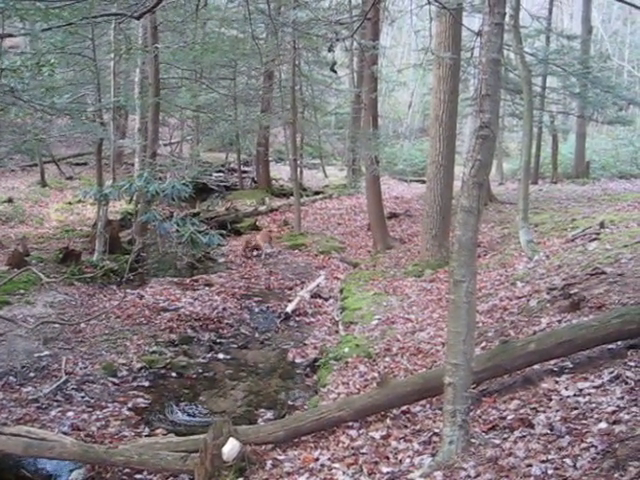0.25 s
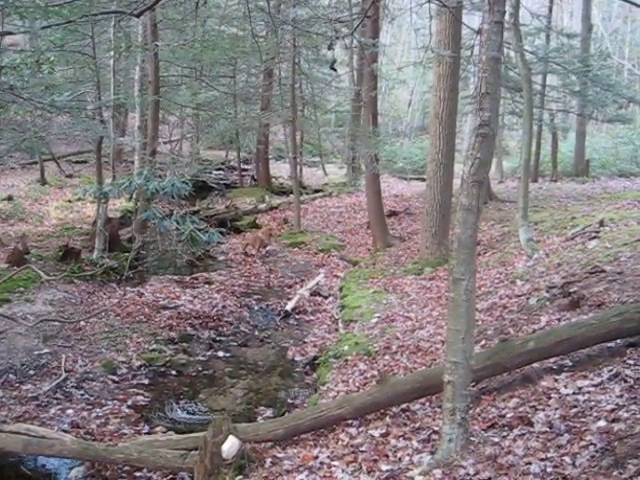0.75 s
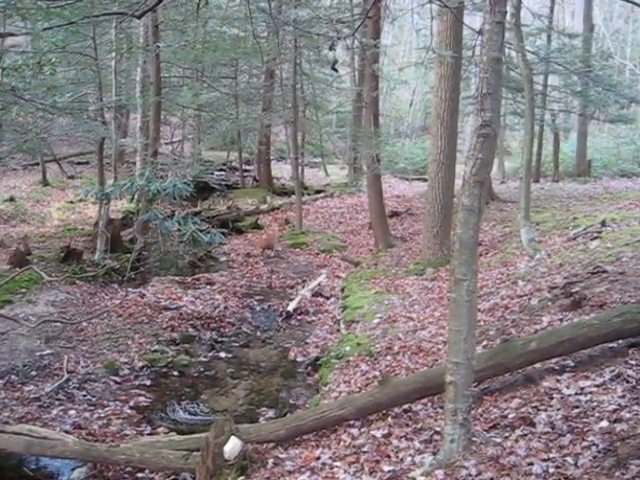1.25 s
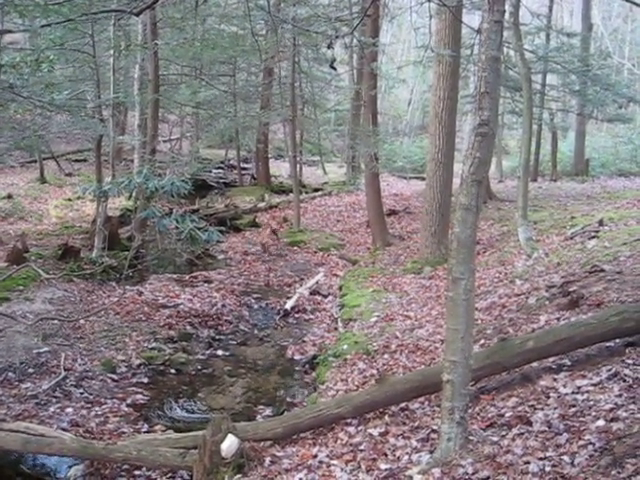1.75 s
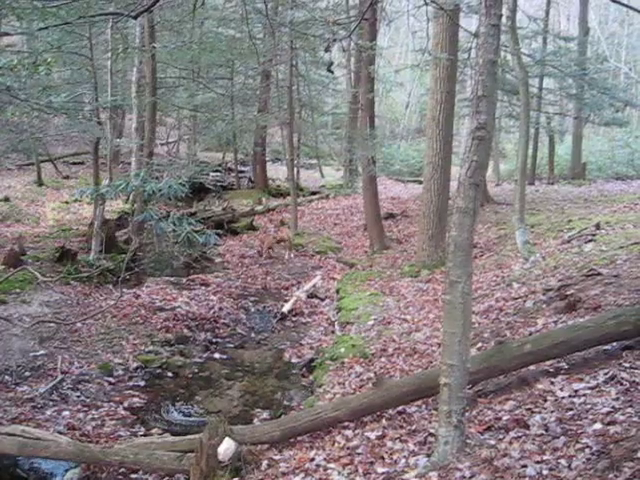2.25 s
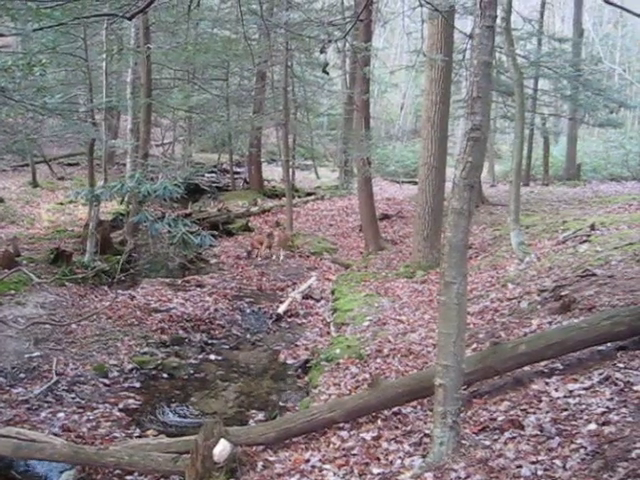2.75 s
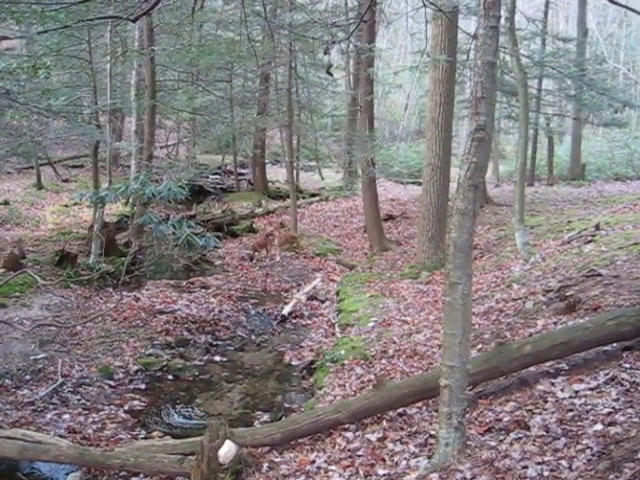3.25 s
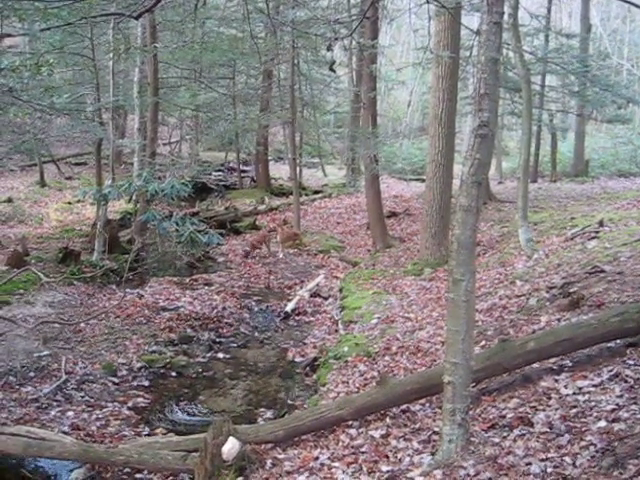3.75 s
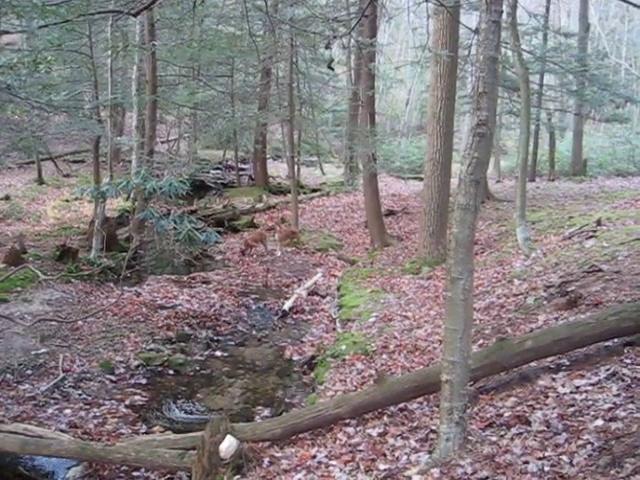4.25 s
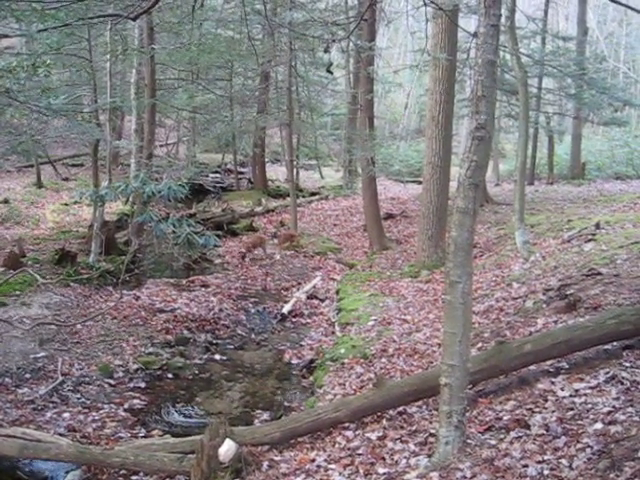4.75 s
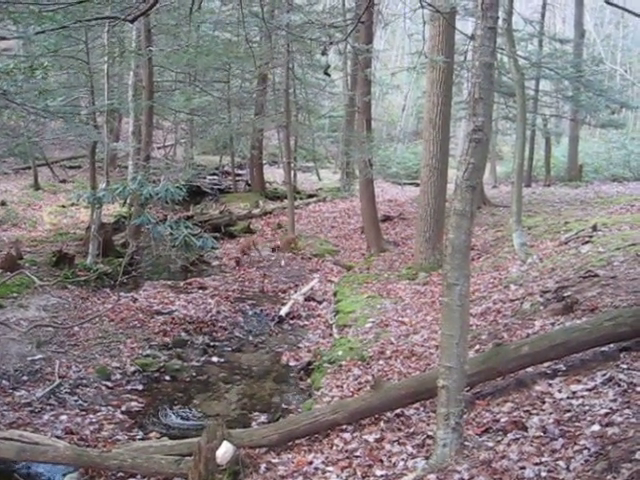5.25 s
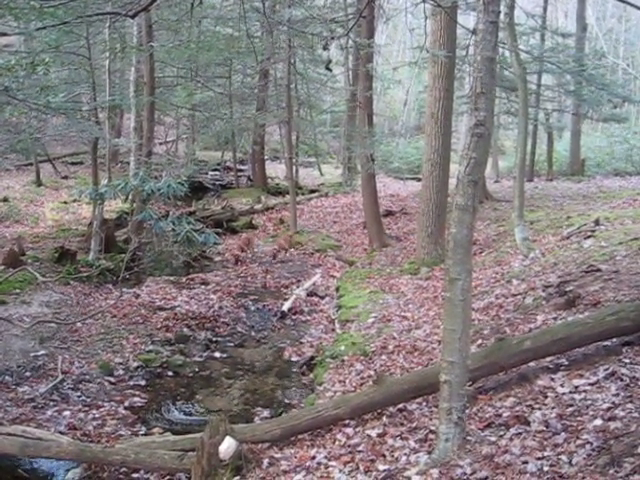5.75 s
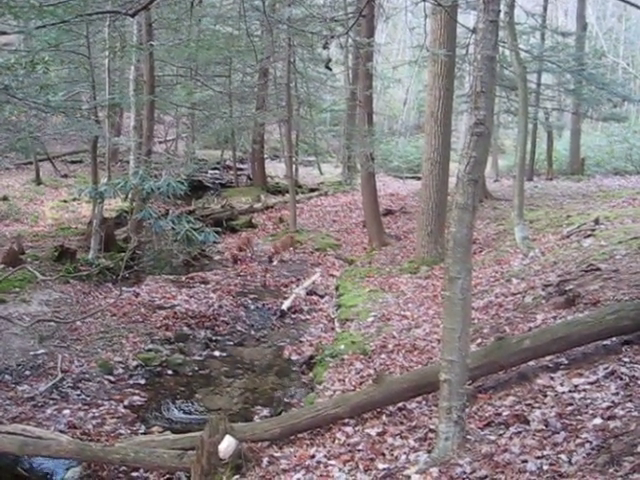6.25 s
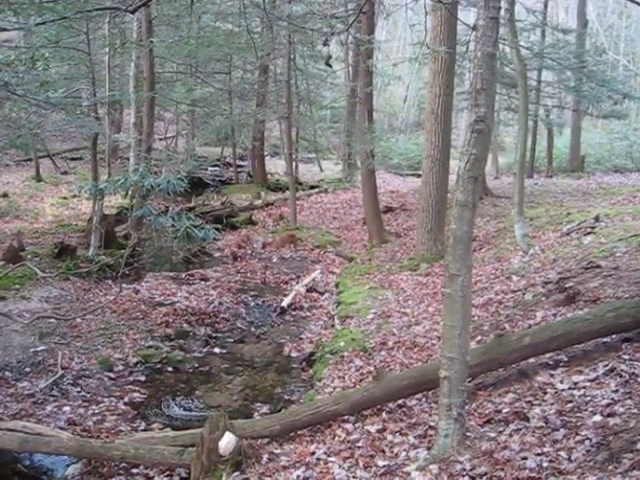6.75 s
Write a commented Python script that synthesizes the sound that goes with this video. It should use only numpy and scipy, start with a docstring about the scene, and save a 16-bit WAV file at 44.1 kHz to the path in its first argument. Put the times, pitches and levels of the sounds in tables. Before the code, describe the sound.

A dog trots through crisp dry leaves beside a trickling creek, its collar tags jingling brightly, under steady water wash and microphone hiss.

```python
"""On the bank of a small creek in a wood, heard through a hissy camera microphone.
A dog trots about in dry leaves: crackle is clicks ringing as leaves of many sizes, snaps are short bursts of it.
Two metal tags on its collar clink as dying modes, then swing: their ringing flashes toward the listener and away.
Behind lie the creek's bubbles (short rising notes) and a bed of filtered noise: far water and microphone hiss."""
import sys
import numpy as np
from scipy import signal
from scipy.fft import rfft, irfft, next_fast_len
from scipy.io import wavfile

SR = 44100
rng = np.random.default_rng(int(sys.argv[2]) if len(sys.argv) > 2 else 0)


def int16_out(signal):
    """Quantize to a 16-bit WAV file."""
    q = np.round(np.clip(np.atleast_2d(signal).T, -1, 1) * 32767)
    wavfile.write(sys.argv[1], SR, q.astype(np.int16))


N = 308259

# leaves and twigs snapping under a paw: [t/s, peak level/dB, t60/s]
SNAPS = [(0.136, -37, 0.3), (0.407, -35.5, 0.18), (.541, -32, 0.13), (0.873, -29.5, 0.13),
         (.96, -32.5, 0.06), (1.07, -29.5, 0.13), (1.111, -30.5, 0.11), (1.172, -31, 0.027),
         (1.574, -29.5, 0.12), (1.635, -25.5, 0.05), (1.671, -28.5, 0.087), (1.954, -32.5, 0.089),
         (2.157, -31, 0.02), (2.284, -29, 0.06), (2.387, -33, 0.34), (2.478, -35, 0.15), (2.566, -29, 0.08),
         (2.668, -26, 0.13), (2.757, -33.5, 0.059), (2.819, -34.5, 0.24), (2.91, -25.5, 0.029),
         (3.271, -25, 0.011), (3.368, -22.5, 0.0068), (4.294, -27, 0.011), (4.299, -24, 0.028),
         (4.752, -27.5, 0.035), (4.844, -32, 0.3), (5.138, -36, .015), (5.198, -34.5, 0.14),
         (5.267, -32.5, 0.2), (5.66, -34.5, 0.08), (5.724, -32.5, 0.049), (5.815, -28.5, 0.017),
         (5.965, -29.5, 0.016), (6.023, -34.5, 0.12), (6.077, -30, 0.022), (6.772, -39, 0.01)]
SNAP_CREST_DB = 4  # a snap's peak stands this far above its rms
SNAP_RISE_SHARE = .045  # rise time as a share of t60: longer crushes build up more slowly
TWIG_T60_S, TWIG_CUT_HZ = .03, 2800  # snaps shorter than this are twigs, with no body below the cut
CRACK_DB = -4  # opening click before colouring, relative to the snap's peak
# a paw ploughs through the leaves: [t of the peak/s, peak level/dB, fade t60/s, damp litter relative level/dB]
PUSHES = [(0, -38, 0.032, -1.5), (.13, -47, 0.94, -8), (.885, -41.5, 0.81, -8.5), (1.08, -51, 0.53, -15),
          (1.6, -39, 1.18, -10), (1.965, -42, 0.11, -18), (2.049, -40, 1.4, -2.5), (2.125, -47, 0.21, 3.5),
          (2.3, -42.5, 0.87, -4), (2.399, -38.5, 0.41, -4), (2.55, -40.5, 0.22, -22),
          (3.45, -48.5, 1.3, -24), (4.32, -45.5, 0.58, -9), (4.75, -44.5, 0.59, -13),
          (5.27, -46.5, 0.84, 2), (5.7, -45.5, 0.36, 0)]
PUSH_RISE_DB_PER_S = 292
# how much the leaves stir as the dog moves about: [t/s, level/dB]
STIR = [(0, -46), (.3, -57), (.86, -53), (1.15, -43.5), (1.5, -50), (1.9, -68.5), (2.9, -48), (3.5, -59),
        (3.7, -65), (4.69, -54.5), (5.17, -52), (5.6, -53.5), (6.05, -48), (6.99, -59.5)]
STIR_LITTER_DB = -12  # damp litter under the stirring, relative
# colour of the dry leaves: [f/Hz, level per Hz/dB]
LEAF_SPECTRUM = [(290, -42), (500, -7.5), (1510, -6), (3010, -0.5), (3960, -1), (7780, -3.5), (11300, -7),
                 (15500, -24.5)]
# colour of the damp litter: [f/Hz, level per Hz/dB]
LITTER_SPECTRUM = [(700, -16.5), (1200, -1), (2150, -4), (2470, 5), (2740, -1), (3000, 2.5), (3700, -13)]
LEAF_RING_CYCLES = 17  # a breaking leaf falls by 60 dB in this many periods

# first tag facing the listener: [t/s, length/s, share spent rising/0-1, ring level/dB]
LOW_TAG_FLASHES = [(0, 0.038, 0.14, -45), (0.905, 0.072, 0.1, -36.5), (1.166, 0.025, .3, -42),
                   (1.342, 0.053, .05, -42), (1.464, 0.05, 0.38, -44.5), (1.553, .04, .3, -38.5),
                   (1.588, .027, .6, -37.5), (1.616, .06, .44, -47), (1.692, .046, .05, -29),
                   (1.731, .13, .57, -47), (2.011, 0.029, .4, -41.5), (2.066, .12, .52, -49),
                   (2.291, 0.05, .09, -33), (3.163, 0.14, .1, -50), (4.634, 0.097, .05, -50.5),
                   (5.101, 0.065, .1, -53)]
# its ringing modes, a close pair that beats: [f/Hz, level/dB]
LOW_RING = [(6938, 0), (7010, -9)]
# blows on it: [t/s, level/dB, share of the power in the top mode/0-1]
LOW_BLOWS = [(1.338, -46, .05), (1.46, -40, 0.3), (1.693, -30, 0.7), (2.295, -34, 0), (4.641, -38, 0.05)]
# its struck modes, lower then top: [f/Hz, t60/s]
LOW_CLINK = [(10625, .1), (11110, .07)]
# second tag facing the listener: [t/s, length/s, share spent rising/0-1, ring level/dB]
HIGH_TAG_FLASHES = [(0, 0.097, 0.17, -50), (0.892, 0.08, .18, -39), (1.154, 0.059, .25, -37),
                    (1.214, 0.094, .18, -41.5), (1.348, 0.03, .3, -48), (1.466, 0.074, 0.37, -37),
                    (1.55, 0.083, .03, -38), (1.647, 0.032, .3, -39), (1.676, 0.063, 0.89, -32),
                    (1.74, .065, .59, -36), (1.817, .06, .06, -39), (2.005, .025, .15, -42),
                    (2.033, .1, .36, -36), (2.138, .085, .2, -44), (2.293, .037, .15, -33.5),
                    (2.338, .07, .5, -41), (2.42, .09, .14, -46), (3.168, .047, .05, -44.5),
                    (3.207, .085, .6, -40), (4.697, .03, .2, -49), (5.108, 0.26, .1, -52),
                    (5.745, 0.08, .5, -51)]
HIGH_RING_HZ = 8008
# blows on it: [t/s, level/dB, share of the power in the top mode/0-1]
HIGH_BLOWS = [(.9, -45, .75), (.945, -45, 0.82), (1.14, -50, .01), (1.345, -53, .99), (1.46, -53, .9),
              (1.553, -43, .8), (1.635, -32, .01), (1.684, -42, .2), (1.826, -47, 0.11), (2.007, -49, .99),
              (2.042, -48, .01), (2.293, -41, .99)]
# its struck modes, a close pair, the top mode, then a weaker one below: [f/Hz, t60/s]
HIGH_OVERTONES = [(14500, .3), (14585, .2), (14890, .2), (12350, .08)]
PAIR_DB = -2  # upper of the pair, relative to the lower
# speed of the second tag toward the listener: [t/s, speed/(m/s)]
APPROACH = [(0, .2), (1.82, 0), (2, -2), (2.14, -2.4), (2.29, -.5), (3.2, .1), (5.1, -2.6), (5.75, -3.2)]
SWING_M_PER_S = .4  # spread of a tag's speed
# a tag rings on faintly, in beads, once turned away
LINGER_S, LINGER_DB, LINGER_BEAT_HZ = 0.25, -12.5, 38
SOUND_M_PER_S = 343

# single bubbles that stand out of the creek: [t/s, peak level/dB, starting f/Hz]
PLOPS = [(0.055, -41, 1240), (0.337, -39, 3460), (0.386, -40, 830), (1.366, -32, 3120), (1.38, -40, 1010),
         (1.671, -39.5, 1180), (1.893, -40, 846), (2.037, -33, 2540), (2.129, -41.5, 600),
         (2.407, -31, 2540), (2.482, -37, 3860), (2.619, -36, 2980), (2.645, -37, 3000), (3.419, -43, 890),
         (3.776, -44, 3080), (4.009, -43.5, 1064), (4.078, -41, 3700), (4.109, -44, 834),
         (4.205, -34.5, 3340), (4.267, -44.5, 330), (4.293, -47, 436), (4.334, -47, 460),
         (4.428, -39, 2850), (4.469, -47, 620), (4.557, -38, 3060), (4.65, -39.5, 1740), (4.878, -39, 954),
         (5.005, -41, 1840), (5.034, -39, 2820), (5.272, -39, 1480), (5.349, -31, 3070),
         (5.617, -37.5, 2910), (5.726, -38, 3000), (5.797, -44, 900), (5.852, -36, 3070),
         (6.456, -39, 4350), (6.515, -41, 3000), (6.603, -38, 3020), (6.929, -37.5, 2370)]
# small droplets at random: [rate/(1/s), centre f/Hz, spread/octaves, length/cycles, level/dB]
PATTER = [(300, 2000, .55, 51, -59), (276, 3100, 0.144, 77, -58), (200, 4500, 0.296, 47, -59)]
# a hollow burbles on one note: [t/s, peak level/dB, fade t60/s]
GURGLES = [(5.83, -52.5, 1.2), (6.47, -53, 0.34), (6.56, -53, 0.32)]
# one broad gulp: [t/s, peak level/dB, fade t60/s]
GULP = (4.876, -46, .25)
GURGLE_DB = -60.5  # steady low gurgle
GURGLE_RISE_DB_PER_S, GULP_RISE_DB_PER_S = 400, 800
# far water and microphone hiss: [f/Hz, level per Hz/dB]
BED_SPECTRUM = [(15, -42), (25, 2), (604, -2.5), (1980, -3.5), (3880, -7), (8970, -8.5), (11700, -5.5),
                (13100, -11), (15800, -13.5)]
BED_DB = -49

PORT_HZ, PORT_WIDTH_HZ, PORT_DB = 11550, 1000, 7.0  # resonance of the microphone port
CUTOFF_HZ = 15780


def leaves():
    """Clumped crackle of dry leaves over a hollower crunch of damp litter, with the snaps on top."""
    dry_power = from_db(2 * np.interp(np.arange(N) / SR, *np.transpose(STIR)))
    litter_power = dry_power * from_db(2 * STIR_LITTER_DB)
    for s, db, t60, litter_db in PUSHES:
        push = swell(s, db, PUSH_RISE_DB_PER_S, t60)
        dry_power = dry_power + push
        litter_power = litter_power + push * from_db(2 * litter_db)
    grains = crackle(4500, 1.4) * from_db(drift(56))
    dry_leaves = high_pass(coloured(grains, LEAF_SPECTRUM), 3000)
    crunch = coloured(clicks(2000, 2.8) * from_db(1.7 * drift(34)), LITTER_SPECTRUM)
    stirred = np.sqrt(dry_power) * rms_one(dry_leaves) + np.sqrt(litter_power) * rms_one(crunch)
    return stirred + snaps()


def snaps():
    """Each snap is a burst of breaking leaf that dies fast; the shorter it is, the stronger its opening crack."""
    crushes, twigs, cracks = np.zeros((3, N))
    t = np.arange(int(.2 * SR)) / SR
    for s, peak_db, t60 in SNAPS:
        rise = np.minimum(t / (SNAP_RISE_SHARE * t60), 1)
        envelope = from_db(peak_db - SNAP_CREST_DB - 60 * t / t60) * rise
        add(twigs if t60 < TWIG_T60_S else crushes, s, envelope)
        add(cracks, s, from_db([peak_db + CRACK_DB]) * np.exp(-(t60 / TWIG_T60_S) ** 2))
    breaking = rms_one(coloured(crackle(12000, 1.5), LEAF_SPECTRUM))
    thin = high_pass(coloured(cracks, LEAF_SPECTRUM) + twigs * breaking, TWIG_CUT_HZ)
    return thin + crushes * breaking


def crackle(per_s, spread_db):
    """Clicks dealt among leaves of many sizes, each ringing a moment; even per Hz, rms 1."""
    source = clicks(per_s, spread_db)
    dealt = rng.integers(0, 24, N)
    out = 0
    for k, hz in enumerate(np.geomspace(500, 15000, 24)):
        r, w = from_db(-60 * hz / (LEAF_RING_CYCLES * SR)), 2 * np.pi * hz / SR
        struck_leaf = source * (dealt == k) + 1e-18  # the tiny offset avoids denormal numbers
        out = out + hz * signal.lfilter([np.sin(w)], [1, -2 * r * np.cos(w), r * r], struck_leaf)
    return rms_one(out)


def clicks(per_s, spread_db):
    """Random clicks, many small and few large; rms 1."""
    sizes = from_db(spread_db * np.minimum(rng.exponential(1, N), 5))
    sizes = sizes * rng.choice([-1, 1], N)
    return rms_one(sizes * (rng.random(N) < per_s / SR))


def tags():
    """Low modes ring on and follow the swing; high ones die after the blow; running shifts the second tag."""
    out = np.zeros(N)
    for s, length, rising, ring_db in LOW_TAG_FLASHES:
        turn = flash(length, rising)
        ring = sum(from_db(ring_db + db) * tone(hz, len(turn)) for hz, db in LOW_RING)
        add(out, s, turn * ring)
    for s, length, rising, ring_db in HIGH_TAG_FLASHES:
        turn = flash(length, rising)
        add(out, s, turn * from_db(ring_db) * tone(HIGH_RING_HZ * doppler(s), len(turn)))
    for s, db, top in LOW_BLOWS:
        for (hz, t60), gain in zip(LOW_CLINK, shared(db, top)):
            add(out, s, gain * struck(hz, t60))
    for s, db, top in HIGH_BLOWS:
        low, high = shared(db, top)
        gains = (low, low * from_db(PAIR_DB), high, low * from_db(-6))
        for (hz, t60), gain in zip(HIGH_OVERTONES, gains):
            add(out, s, gain * struck(hz * doppler(s), t60))
    return out


def flash(length, rising):
    """Loudness while a swinging tag turns toward the listener and away, with a faint beaded ring after."""
    life, rising = np.linspace(0, 1, int(length * SR)), np.clip(rising, .03, .9)
    turn = np.where(life < rising, life / rising, (1 - life) / (1 - rising))
    knots = rng.standard_normal(int(length * 90) + 2)
    tremble_db = np.interp(life, np.linspace(0, 1, len(knots)), 2.5 * knots)
    t = np.arange(len(life) + int(LINGER_S * SR)) / SR
    beads = np.abs(np.sin(np.pi * LINGER_BEAT_HZ * t + np.pi * rng.random()))
    out = from_db(LINGER_DB) * beads * np.minimum(t / length, (t[-1] - t) / LINGER_S)
    out[:len(life)] += np.sin(np.pi / 2 * turn) ** 1.1 * from_db(tremble_db)
    return out


def tone(hz, count):
    """A sine of random phase, a little off pitch as the tag swings."""
    hz = hz * (1 + SWING_M_PER_S * rng.standard_normal() / SOUND_M_PER_S)
    return np.sin(2 * np.pi * (hz * np.arange(count) / SR + rng.random()))


def struck(hz, t60):
    """One mode ringing out after a blow."""
    t = np.arange(int(t60 * SR)) / SR
    return tone(hz, len(t)) * from_db(-60 * t / t60)


def shared(db, top):
    """Gains of the lower and the top mode, which share the power of one blow."""
    top = np.clip(top, 0, 1)
    return from_db(db) * np.sqrt(1 - top), from_db(db) * np.sqrt(top)


def doppler(s):
    """Pitch factor of the second tag at time s as the dog runs."""
    return 1 + np.interp(s, *np.transpose(APPROACH)) / SOUND_M_PER_S


def creek():
    """Smooth far water and hiss, a low gurgle, droplets that come in clumps, and the single plops."""
    bed = rms_one(coloured(rng.standard_normal(N), BED_SPECTRUM))
    out = from_db(BED_DB + 1.45 * drift(4.0)) * bed
    welling = sum(swell(s, db, GURGLE_RISE_DB_PER_S, t60) for s, db, t60 in GURGLES)
    out += np.sqrt(welling) * patter(480, 900, .08, 45.0)
    gulp_s, gulp_db, gulp_t60 = GULP
    low_power = from_db(2 * GURGLE_DB) + swell(gulp_s, gulp_db, GULP_RISE_DB_PER_S, gulp_t60)
    out += np.sqrt(low_power) * patter(480, 880, .3, 30.0)
    for per_s, centre_hz, octaves, cycles, level_db in PATTER:
        out += from_db(level_db + 1.37 * drift(12.0)) * patter(per_s, centre_hz, octaves, cycles)
    for s, db, hz in PLOPS:
        add(out, s, from_db(db) * bubble(hz, 79.0 * min(1, hz / 800), 0.078))
    return out


def patter(per_s, centre_hz, octaves, cycles):
    """Bubbles born at random, sizes spread about a centre; rms 1."""
    out = np.zeros(N)
    draws = np.c_[rng.random((3500, 1)), rng.standard_normal((3500, 2))]
    for when, size, loud in draws[:int(per_s * N / SR)]:
        note = bubble(centre_hz * 2 ** (octaves * size), cycles, 0.05)
        add(out, when * N / SR, from_db(6.5 * min(loud, 1.55)) * note)
    return rms_one(out)


def bubble(hz, cycles, rise):
    """A bubble's note climbs as it nears the surface and dies in `cycles` periods of its starting pitch."""
    t = np.arange(int(cycles / hz * SR)) / SR
    life = t * hz / cycles
    note = np.sin(2 * np.pi * hz * t * (1 + rise * life))
    return note * from_db(-60 * life) * np.minimum(life / 0.02, 1)


def swell(s, db, rise_db_per_s, t60):
    """Power of a sound that climbs to its peak at s and fades."""
    late = np.arange(N) / SR - s
    below_peak_db = np.where(late < 0, -rise_db_per_s * late, 60 * late / t60)
    return from_db(2 * (db - below_peak_db))


def drift(rate):
    """Random wander of spread 1, low-passed near `rate` Hz and drawn at every 40th sample."""
    r = np.exp(-80 * np.pi * rate / SR)
    noise = rng.standard_normal(N // 40 + 2002)
    slow = signal.lfilter([1], [1, -2 * r, r * r], noise)[2000:]  # drop the filter's start
    return np.interp(np.arange(N) / 40, np.arange(len(slow)), rms_one(slow))


def coloured(x, spectrum):
    """Filters x by a spectrum of [f/Hz, level/dB], joined along log frequency."""
    size = next_fast_len(len(x))
    hz, db = np.transpose(spectrum)
    bins_hz = np.arange(size // 2 + 1) * SR / size
    gain = from_db(np.interp(np.log(bins_hz + 1), np.log(hz), db))
    return irfft(rfft(x, size) * gain, size)[:len(x)]


def high_pass(x, hz):
    """Second-order low cut."""
    return signal.sosfilt(signal.butter(2, hz, "high", fs=SR, output="sos"), x)


def from_db(db):
    """Decibels to gain."""
    return 10 ** (np.asarray(db) / 20)


def rms_one(x):
    """Scaled to unit rms."""
    return x / np.sqrt(np.mean(x ** 2) + 1e-20)


def add(out, s, x):
    """Mixes x in at time s."""
    i = round(s * SR)
    out[i:i + len(x)] += x[:N - i]


def scene():
    """Leaves, tags and creek, one channel."""
    return (leaves() + tags() + creek())[None]


def record(dry):
    """The microphone port lifts one treble band; deep bass is weak and the top is cut steeply."""
    r = np.exp(-np.pi * PORT_WIDTH_HZ / SR)
    poles = [1, -2 * r * np.cos(2 * np.pi * PORT_HZ / SR), r * r]
    port_band = signal.lfilter([(1 - r * r) / 2, 0, (r * r - 1) / 2], poles, dry)
    heard = dry + (from_db(PORT_DB) - 1) * port_band
    heard = signal.sosfilt(signal.butter(1, 45, "high", fs=SR, output="sos"), heard)
    return signal.sosfilt(signal.ellip(14, .5, 75, CUTOFF_HZ, fs=SR, output="sos"), heard)


dry = scene()
out = record(dry)
int16_out(out)
```